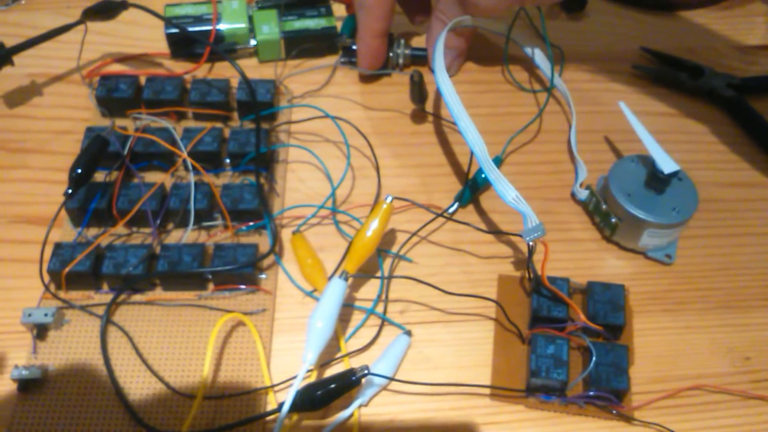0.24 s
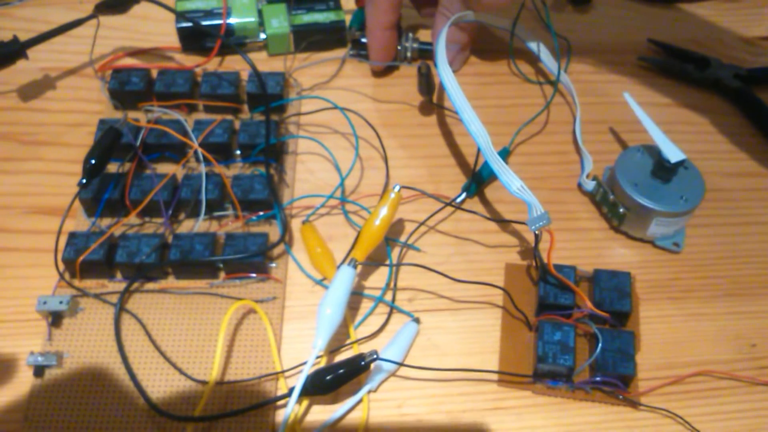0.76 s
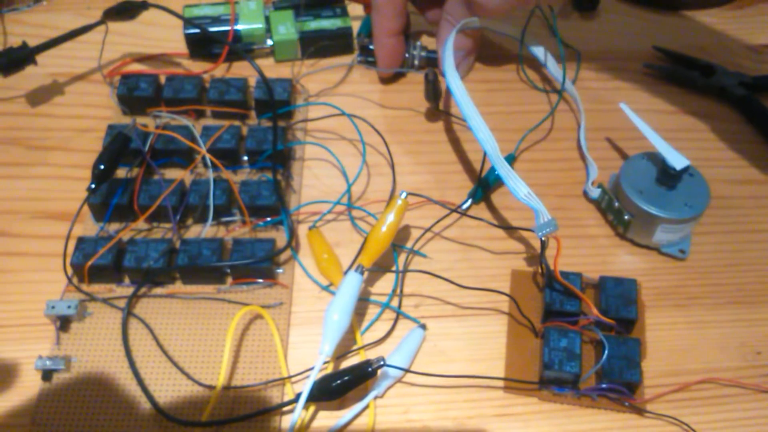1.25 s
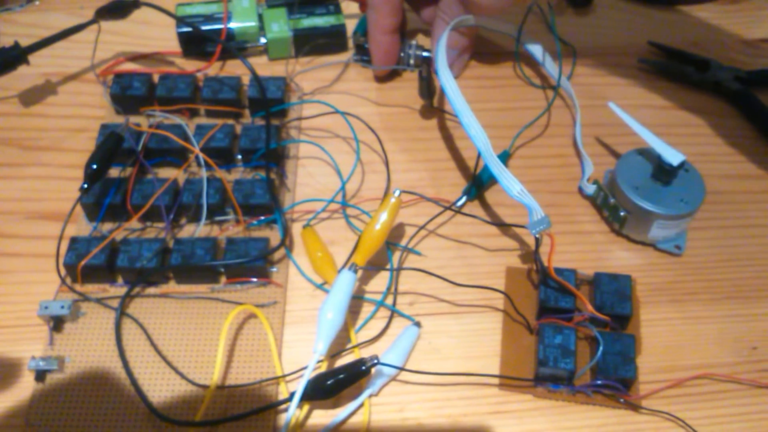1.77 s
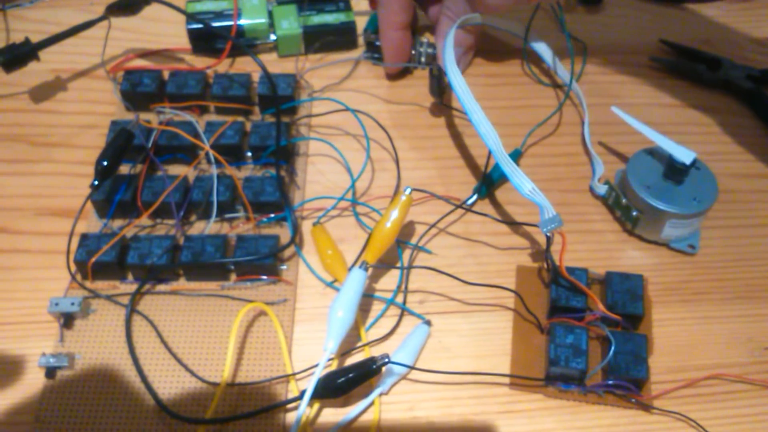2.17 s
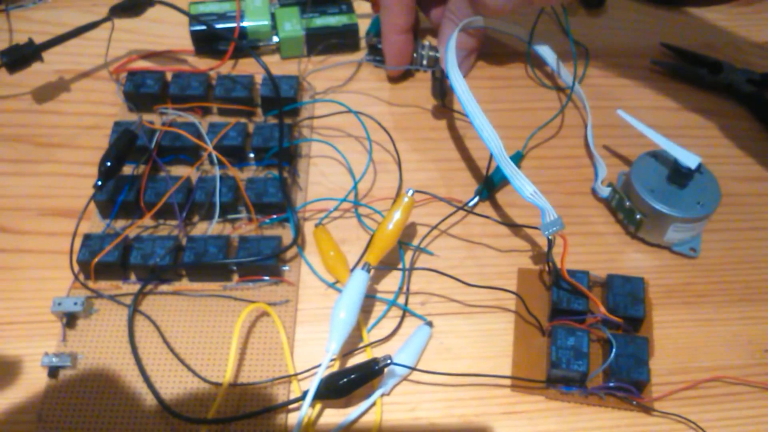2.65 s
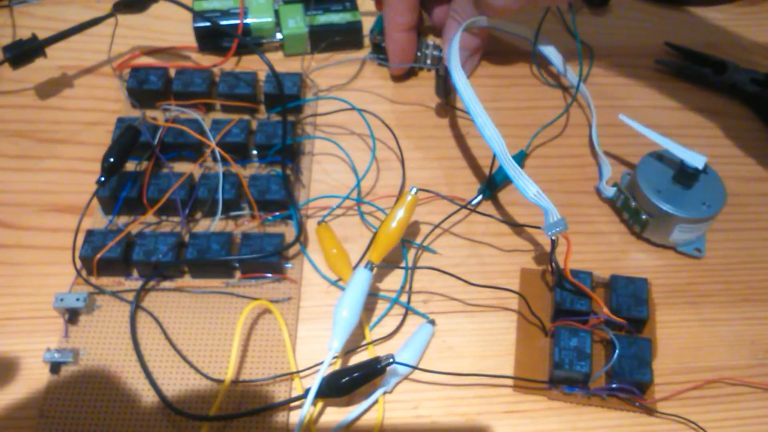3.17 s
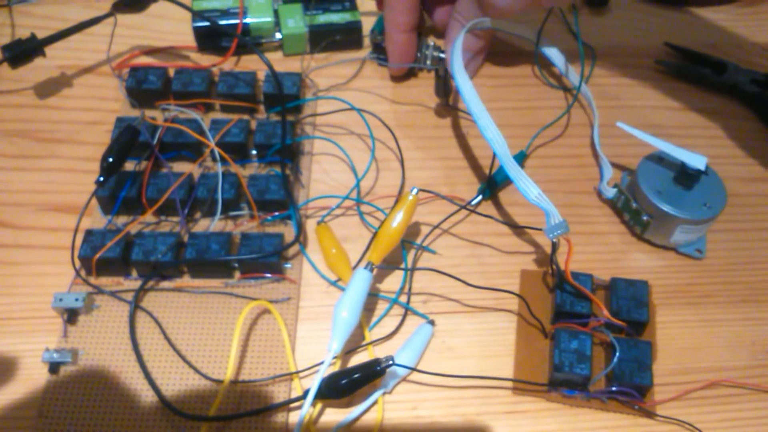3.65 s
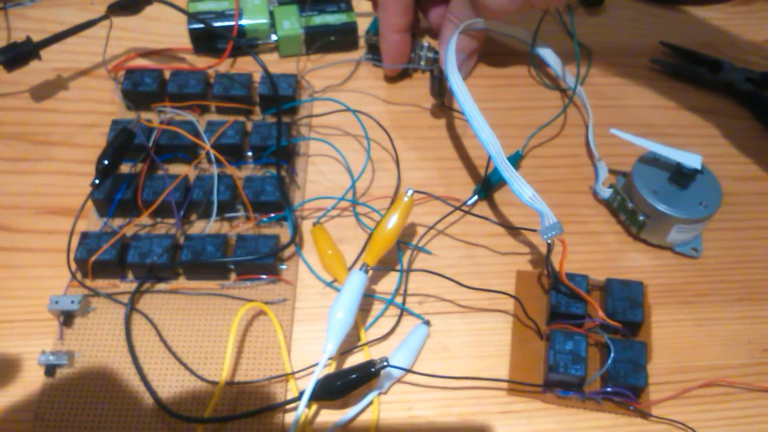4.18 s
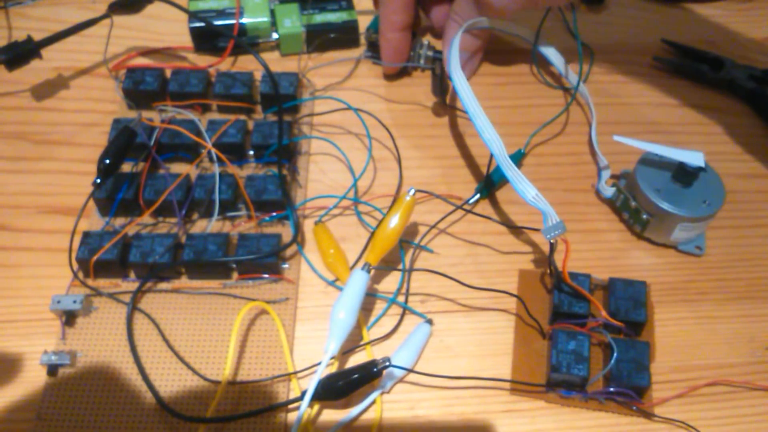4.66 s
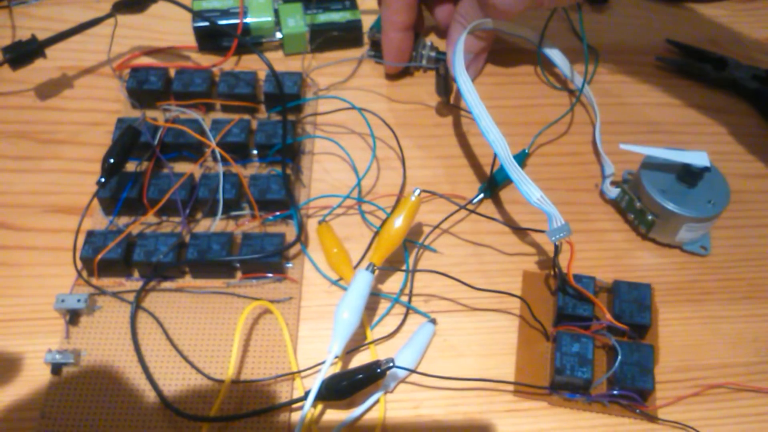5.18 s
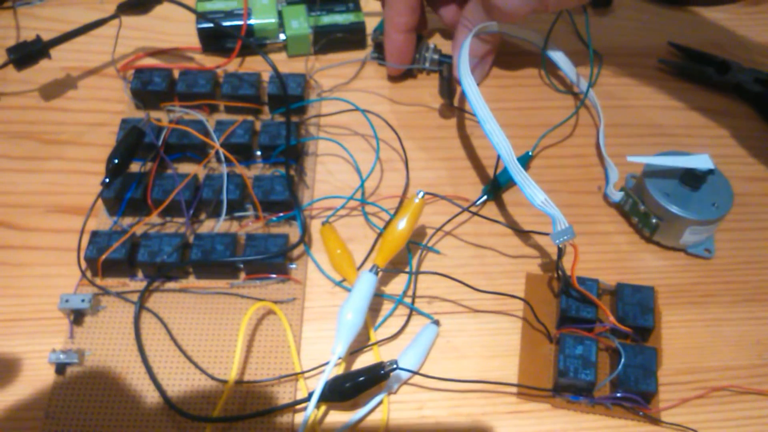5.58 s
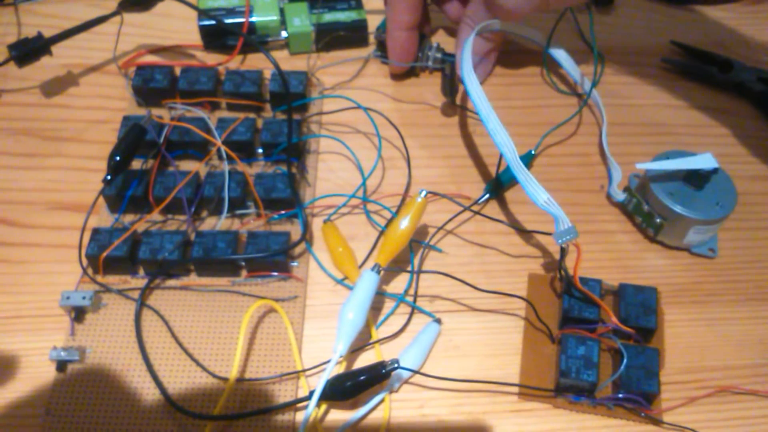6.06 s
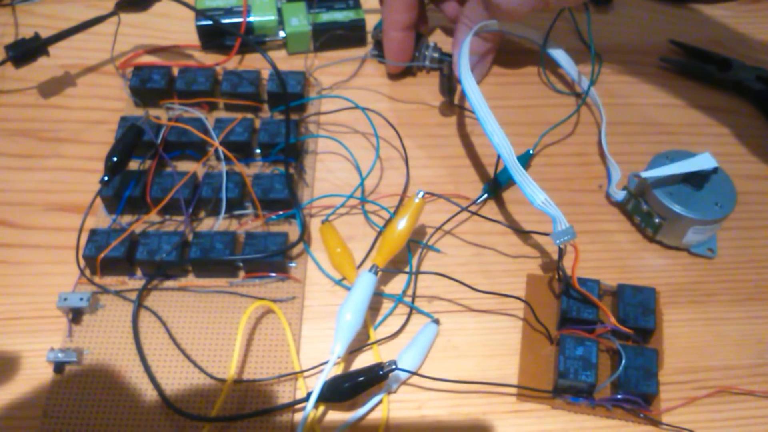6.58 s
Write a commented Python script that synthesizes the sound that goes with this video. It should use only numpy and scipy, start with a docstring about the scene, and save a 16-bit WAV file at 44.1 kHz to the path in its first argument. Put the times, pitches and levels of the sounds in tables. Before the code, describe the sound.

A quiet hiss and low rumble of a small room run throughout. Near 0.6 seconds there is a faint, dull bump on a wooden workbench. At about 1 second a bank of small relays begins clicking, close to the microphone. Each button press makes a sharp, bright snap, really several contacts closing almost together, with a plastic crack, a very short steel ring and a light knock from the circuit board. A little over a tenth of a second later the relays fall back with a softer chatter, every other one ending in a harder clack. These pairs repeat about twice a second, quickening slightly, twelve presses in all, the last at about 6.8 seconds. Beneath them are faint finger rubs before the presses, and tiny button ticks and soft thuds after the releases, the thuds growing a little louder. Each click leaves a short room echo.

```python
"""A bank of small relays on a wooden workbench, worked by a push button about twice a second.
On each press a few armatures snap shut within milliseconds; on release they fall back more softly
and chatter. Every contact cracks in its plastic case and rings the steel; each burst knocks the board.
One microphone close to the bench also catches the finger on the button, faint ticks and thuds,
and the small room answering over a quiet hiss."""
import sys
import numpy as np
from scipy import signal
from scipy.fft import rfft, irfft, next_fast_len
from scipy.io import wavfile

SR = 44100
rng = np.random.default_rng(int(sys.argv[2]) if len(sys.argv) > 2 else 0)


def to_wav(sig):
    """Store sig (one row per channel, or 1-D mono) as 16-bit WAV at the path in sys.argv[1].

    Samples outside -1..1 are clipped; the rate is SR.
    """
    pcm = np.clip(np.atleast_2d(sig), -1, 1) * 32767
    pcm = np.round(pcm).astype(np.int16)
    wavfile.write(sys.argv[1], SR, pcm.T)  # frames by channels


N = 301203
T = np.arange(SR // 4) / SR  # seconds into one short sound


def amp(db):
    """Decibels to gain."""
    return 10 ** (np.asarray(db) / 20)


def unit(x):
    """Scale to rms 1."""
    return x / np.sqrt(np.mean(x ** 2) + 1e-20)


def along(points, hz):
    """Read (Hz, value) points on a log frequency axis."""
    freqs, values = np.transpose(points)
    return np.interp(np.log(hz + 1), np.log(freqs + 1), values)


def add(track, start, sound):
    """Mix a sound into the track, from start in seconds."""
    part = track[max(round(start * SR), 0):][:len(sound)]
    part += sound[:len(part)]


def noise(colour, size):
    """Noise of rms 1 with the given spectrum."""
    hz = np.fft.rfftfreq(size, 1 / SR)
    white = rfft(rng.standard_normal(size))
    return unit(irfft(white * amp(along(colour, hz)), size))


def fade(attack, t60):
    """Envelope of a blow: a quick rise, then a fall of 60 dB in t60 seconds."""
    return (1 - np.exp(-T / attack)) * amp(-60 * T / t60)


# Room tone at the microphone. Each row: frequency in Hz, relative level in dB.
ROOM_TONE = [(15, -57.5), (25, -31), (61, 0.5), (113, -6), (156, -8.5), (260, -12.5), (445, -15),
             (741, -18.5), (826, -17), (997, -19), (1620, -22), (1750, -20), (2630, -23.5), (5430, -24),
             (15500, -26.5)]
def room_tone(level_db, dip_at_s, dip_width_s, dip_db):
    """Steady low rumble and hiss; the level dips once, briefly."""
    dip = np.exp(-((np.arange(N) / SR - dip_at_s) / dip_width_s) ** 4)
    return amp(level_db + dip_db * dip) * noise(ROOM_TONE, N)


# The finger shifting on the button. Each row: centre in seconds, level in dB, swell time in seconds.
FINGER_SHIFTS = [(0.206, -60.5, 0.015), (1.467, -57, 0.0091)]
# The rub, heard close. Each row: frequency in Hz, relative level in dB.
RUB_SPECTRUM = [(100, -15), (350, 0.5), (600, 1.5), (950, 1.5), (1400, -8.5), (2200, -8), (4500, -16),
                (12000, -33)]
def finger_rubs(lead_s, press_db, press_swell_s):
    """The finger rubs the button as it shifts, and as it bears down before each press."""
    track = np.zeros(N)
    bearing_down = [(start - lead_s, press_db, press_swell_s) for start, _ in BUTTON_PRESSES]
    for centre, db, swell_s in FINGER_SHIFTS + bearing_down:
        swell = np.exp(-abs(T - T.mean()) / swell_s)
        add(track, centre - T.mean(), amp(db) * noise(RUB_SPECTRUM, len(T)) * swell)
    return track


# Loose parts on the bench. Each row: start in seconds, level in dB, edge against body in dB.
STRAY_TICKS = [(0.5718, -59, -6), (2.426, -51, 13.5), (4.693, -48, -19), (6.253, -49.5, -20)]
# A tick's body and its sharp edge. Each row: frequency in Hz, relative level in dB.
TICK_SPECTRUM = [(200, -15), (1200, 6), (1700, -4), (2400, -1), (3200, 9), (4300, -14), (10000, -24),
                 (15000, -22)]
EDGE_SPECTRUM = [(200, -13), (2000, 4), (5000, 5), (10000, -2), (15000, -11)]
def ticks(stop_db, stop_edge_db):
    """Loose parts tick now and then; the button ticks against its stop after each release."""
    track = np.zeros(N)
    stops = [(start + travel, stop_db, stop_edge_db) for start, _, travel in BUTTON_RELEASES]
    for start, db, edge_db in STRAY_TICKS + stops:
        body = noise(TICK_SPECTRUM, len(T)) * fade(0.00012, 0.014)
        edge = noise(EDGE_SPECTRUM, len(T)) * fade(0.0001, 0.0047)
        add(track, start, amp(db) * (body + amp(edge_db) * edge))
    return track


# A bump on the bench. Each row: start in seconds, level in dB.
BENCH_BUMPS = [(0.573, -44.5)]
# Its bass-heavy tone. Each row: frequency in Hz, relative level in dB.
BUMP_SPECTRUM = [(30, -17), (70, 8), (120, -5), (200, -6), (300, -3), (500, -16), (1200, -15), (3000, -41),
                 (10000, -42)]
def bench_bump():
    """The wooden bench takes a dull blow that dies at once."""
    track = np.zeros(N)
    for start, db in BENCH_BUMPS:
        add(track, start, amp(db) * noise(BUMP_SPECTRUM, len(T)) * fade(0.0014, 0.048))
    return track


PULL_IN, DROP_OUT = 0, 1  # the armature's two strokes
# The button closes. Each row: start in seconds, strength in dB.
BUTTON_PRESSES = [(1.025, -2), (1.5752, -0.5), (2.131, 0), (2.6857, 1), (3.2039, -1.5), (3.7124, 0),
                  (4.2248, .5), (4.7494, 1), (5.2917, -1), (5.813, 0), (6.3094, 0), (6.8194, 1)]
# The button opens. Each row: start in seconds, strength in dB, travel back to its stop in seconds.
BUTTON_RELEASES = [(1.166, -1, .141), (1.7142, -.5, .128), (2.251, 0, 0.11), (2.8085, -0.5, .135),
                   (3.3191, -1.5, 0.14), (3.8412, 0, 0.11), (4.3452, 0.5, 0.11), (4.8749, 0.5, .108),
                   (5.4196, -0.5, 0.094), (5.9265, 0, .128), (6.4315, .5, 0.13)]
# Four bursts of armatures snapping shut on presses.
# Each row of a burst: delay in seconds, crack strength in dB, steel ring strength in dB.
PULL_INS = [
    [(0, -17, -17), (.0033, -14.5, -11.5), (.0069, -18, -17)],
    [(0, -17.5, -13), (.0037, -15.5, -23.5), (.0074, -19, -24)],
    [(0, -17.5, -12.5), (.0037, -18, -25)],
    [(0, -18, -14), (.0039, -19.5, -26), (.0074, -20.5, -25.5), (.0132, -21.5, -23.5)],
]
# Two softer bursts of armatures falling back on releases; the first ends in a hard clack. Rows as above.
DROP_OUTS = [
    [(0, -30, -25.5), (.0018, -27, -31.5), (.0058, -26, -31), (.01, -18.5, -17)],
    [(0, -26, -24.5), (.0025, -30.5, -28), (.0062, -26, -30), (.0131, -30.5, -29.5)],
]
def relays():
    """Armatures snap shut on each press and fall back on each release; the bursts take turns."""
    track = np.zeros(N)
    for step, (start, db) in enumerate(BUTTON_PRESSES):
        contacts = PULL_INS[step % len(PULL_INS)]
        add(track, start, amp(db) * burst(PULL_IN, contacts, crack_t60=0.013))
    for step, (start, db, _) in enumerate(BUTTON_RELEASES):
        contacts = DROP_OUTS[step % len(DROP_OUTS)]
        add(track, start, amp(db) * burst(DROP_OUT, contacts, crack_t60=0.019))
    return track


# The case, heard close. Each row: frequency in Hz, relative level in dB on pull-in, then on drop-out.
CASE_SPECTRUM = [(100, -28, -27.5), (401, -16.5, -7.5), (1210, -24.5, -18.5), (2580, -23.5, -9),
                 (3150, -2, -3.5), (4210, 5.5, 5), (6020, 1, 0.5), (7600, 8.5, 5.5), (9260, -0.5, -1.5),
                 (10820, 2.5, 1), (12950, 2, -2), (14920, 2, -3.5)]
def case_crack(stroke, t60):
    """A sharp snap, then the dense, quickly dying resonances of the plastic case."""
    colour = np.array(CASE_SPECTRUM)[:, [0, 1 + stroke]]
    snap = amp(-3) * fade(0.00005, 0.0026)
    return noise(colour, len(T)) * (snap + fade(0.0001, t60))


def ring(modes, stroke, attack, detune, scatter_db):
    """Struck modes; no two blows share quite the same tuning and strengths."""
    hz, t60, *stroke_db = np.transpose(modes)[:, :, None]
    pitch, strength = rng.standard_normal((2, len(modes), 1))
    tuned_hz = hz * (1 + detune * pitch)
    phase = 2 * np.pi * (tuned_hz * T + rng.random((len(modes), 1)))
    gain = amp(stroke_db[stroke] + scatter_db * strength)
    return np.sum(gain * fade(attack, t60) * np.sin(phase), axis=0)


# The frame with its contact blades, and the steel armature with its spring.
# Each row: frequency in Hz, t60 in seconds, relative level in dB on pull-in, then on drop-out.
FRAME_MODES = [(1668, 0.044, -24.5, -17.5), (2093, .03, -28.5, -19.5), (4130, 0.021, -9.5, -4.5),
               (4523, .016, -16.5, -14.5), (4693, 0.028, -11, -11.5), (5015, 0.024, -4, -8),
               (11270, .014, -18.5, -12.5), (15330, .008, -1.5, 0.5)]
ARMATURE_MODES = [(7514, 0.017, -8.5, -12), (7530, .012, -17, -14), (8137, 0.022, -2.5, -5),
                  (8418, 0.017, -1.5, -4), (9200, .016, -18, -17)]
def contact(stroke, crack_db, ring_db, crack_t60):
    """One strike, at the microphone and as sent into the room: the crack spreads more than the ring."""
    case = amp(crack_db) * case_crack(stroke, crack_t60)
    frame = amp(crack_db) * ring(FRAME_MODES, stroke, attack=0.0003, detune=0.0071, scatter_db=1.9)
    steel = unit(ring(ARMATURE_MODES, stroke, attack=0.0005, detune=0.0045, scatter_db=3))
    metal = frame + amp(ring_db - 19.5) * steel
    return case + metal, case + amp(-2.5) * metal


# The circuit board lying on the bench.
# Each row: frequency in Hz, t60 in seconds, relative level in dB on pull-in, then on drop-out.
BOARD_MODES = [(135, 0.1, -14, -16), (325.6, 0.062, -1.5, 1.5), (377.3, 0.062, 0, 0),
               (457, 0.054, -5, -7.5), (532, 0.072, -8.5, -4.5), (619, 0.12, -13, -11.5),
               (721, 0.044, -10, -4.5), (821, 0.045, -5, -10), (963, .05, -6, -5.5),
               (1069, 0.043, -11, -10), (1358, 0.034, -8.5, -23), (1610, 0.044, 4, 0.5),
               (1781, 0.055, -5.5, -1.5)]
def burst(stroke, contacts, crack_t60):
    """A quick run of contacts sets the heavy board swinging once; the room answers every blow."""
    knock = amp(-34) * ring(BOARD_MODES, stroke, attack=0.0063, detune=0.022, scatter_db=1.2)
    blows = [(delay, *contact(stroke, crack_db, ring_db, crack_t60))
             for delay, crack_db, ring_db in contacts]
    blows.append((0.0014, knock, amp(-4) * knock))  # the board follows just after the first contact
    sound = np.zeros(SR)
    for delay, direct, into_room in blows:
        add(sound, delay, direct)
        add(sound, delay, room(into_room, build_up_s=0.002, early_db=-8, early_t60=0.038))
    return sound


# The small room's decay. Each row: frequency in Hz, t60 in seconds.
TAIL_T60 = [(150, 0.43), (400, 0.21), (1500, 0.29), (4500, 0.33), (8000, 0.33), (15000, 0.15)]
# Its tail at the microphone. Each row: frequency in Hz, gain in dB.
TAIL_GAIN = [(100, -1), (400, 4.5), (1000, 5.5), (1700, 1), (2600, -5.5), (4000, -9.5), (5000, -6),
             (6200, 0), (8200, -11), (10000, -6.5), (15000, -6)]
def room(sound, build_up_s, early_db, early_t60):
    """Close reflections off the bench, then a diffuse tail whose highest treble dies first."""
    hz, t, bands = signal.stft(rng.standard_normal(SR // 2), SR, nperseg=256)
    decay = amp(-60 * t / along(TAIL_T60, hz)[:, None])
    energy = np.sum(decay ** 2, axis=1, keepdims=True) * t[1] * SR
    decay *= amp(along(TAIL_GAIN, hz))[:, None] / np.sqrt(energy)
    response = signal.istft(bands * decay, SR, nperseg=256)[1]
    response *= 1 - np.exp(-np.arange(len(response)) / SR / build_up_s)
    early = rng.standard_normal(len(T)) * fade(0.00067, early_t60)
    add(response, 0, amp(early_db) * early / np.linalg.norm(early))
    return signal.fftconvolve(sound, response)


# A soft thud at the bench. Each row: frequency in Hz, relative level in dB.
THUD_SPECTRUM = [(100, -14), (220, -13), (320, -7.5), (450, -17.5), (1000, -24.5), (2500, -33), (8000, -54)]
def release_thuds(first_lag_s, last_lag_s, first_db, last_db):
    """A thud follows each release, sooner and louder as the finger gets brisker."""
    track = np.zeros(N)
    lags = np.linspace(first_lag_s, last_lag_s, len(BUTTON_RELEASES))
    levels = np.linspace(first_db, last_db, len(BUTTON_RELEASES))
    for (start, *_), lag, db in zip(BUTTON_RELEASES, lags, levels):
        add(track, start + lag, amp(db) * noise(THUD_SPECTRUM, len(T)) * fade(0.0035, 0.25))
    return track


def scene():
    """Relays up close and faint handling over the room tone, in mono."""
    mix = room_tone(level_db=-62.5, dip_at_s=0.878, dip_width_s=0.01, dip_db=-17)
    mix += relays()
    mix += ticks(stop_db=-49.5, stop_edge_db=-9)
    mix += finger_rubs(lead_s=0.036, press_db=-61.5, press_swell_s=0.037)
    mix += release_thuds(first_lag_s=0.205, last_lag_s=0.092, first_db=-66, last_db=-49.5)
    mix += bench_bump()
    return mix[None]


def record(dry):
    """The microphone rounds off the highest peaks; a steep low-pass cuts the very top."""
    ceiling, top_hz = 0.75, 15780
    rounded = dry / (1 + (dry / ceiling) ** 4) ** (1 / 4)
    size = next_fast_len(N + SR // 4)
    hz = np.fft.rfftfreq(size, 1 / SR)
    lowpass = 1 / np.sqrt(1 + (hz / top_hz) ** 240)
    return irfft(rfft(rounded, size) * lowpass, size)[:, :N]


dry = scene()
out = record(dry)
to_wav(out)
```